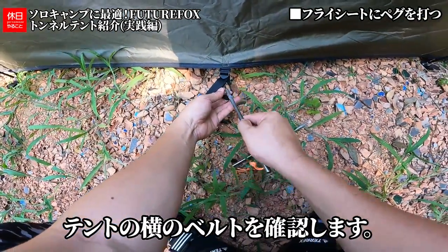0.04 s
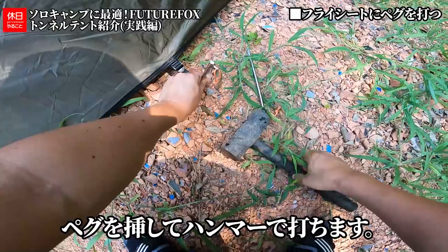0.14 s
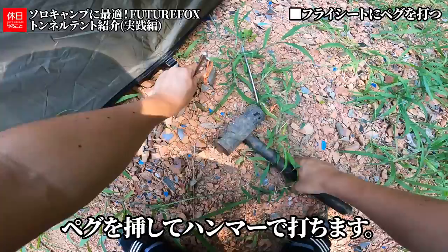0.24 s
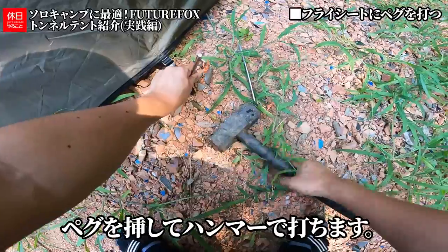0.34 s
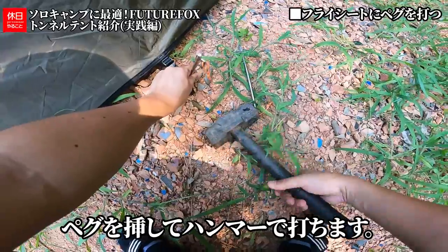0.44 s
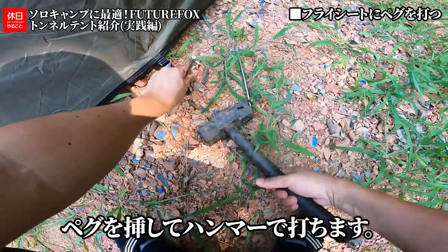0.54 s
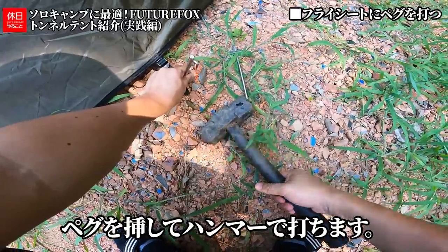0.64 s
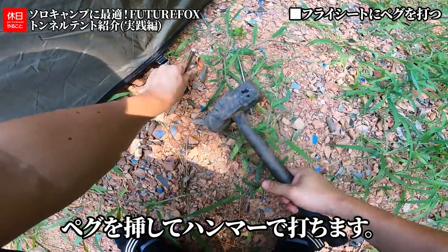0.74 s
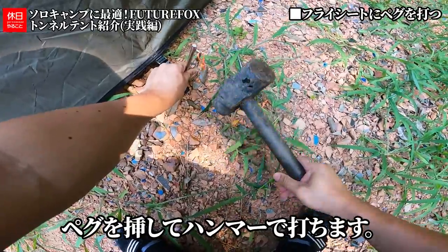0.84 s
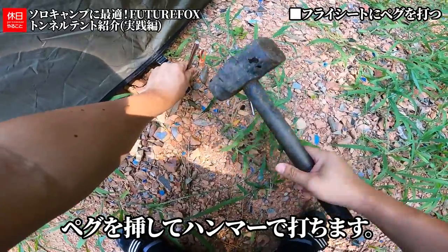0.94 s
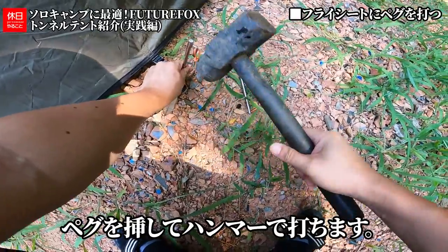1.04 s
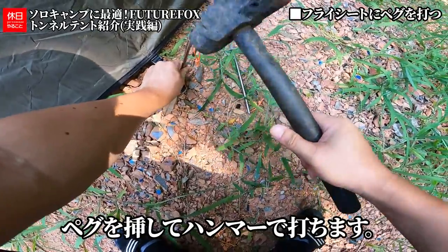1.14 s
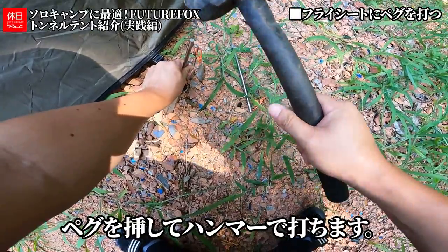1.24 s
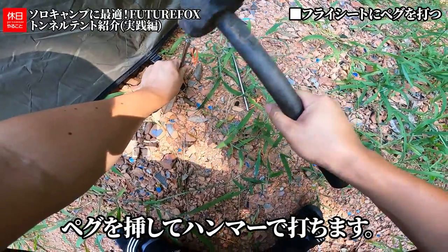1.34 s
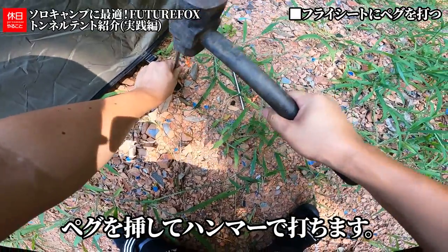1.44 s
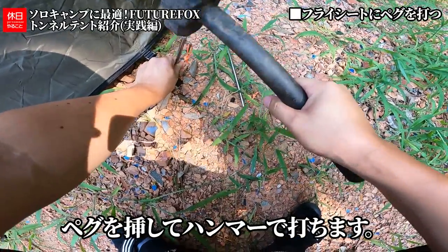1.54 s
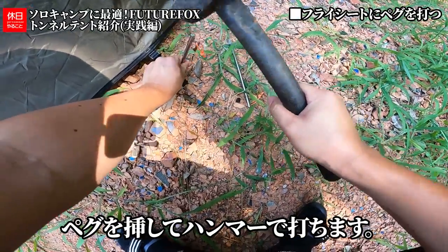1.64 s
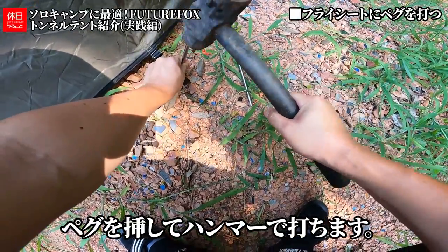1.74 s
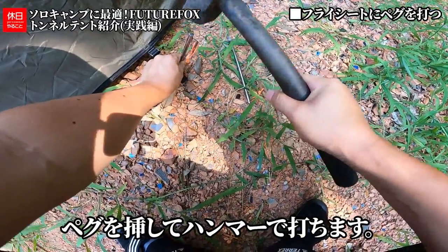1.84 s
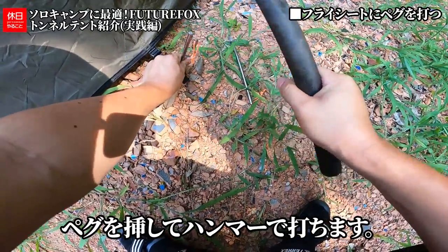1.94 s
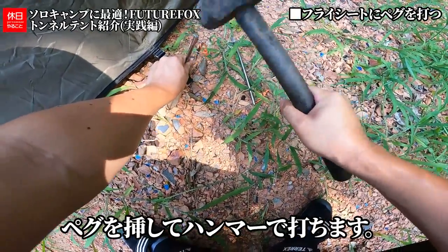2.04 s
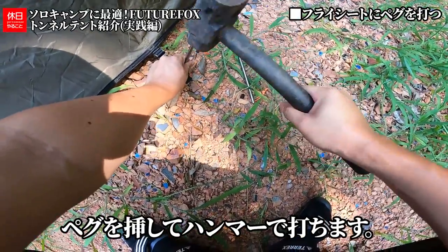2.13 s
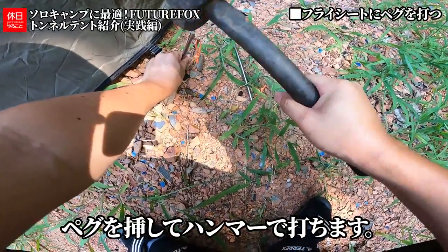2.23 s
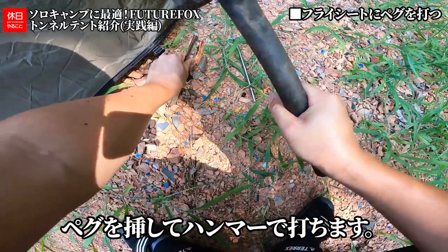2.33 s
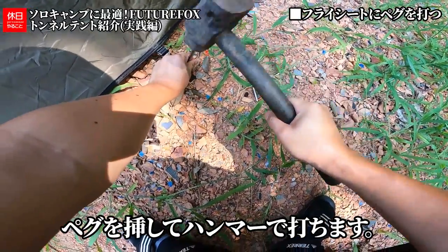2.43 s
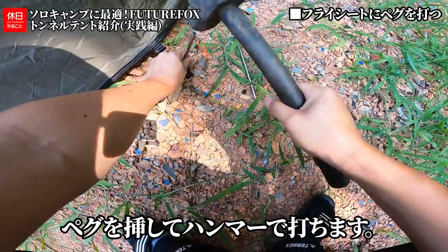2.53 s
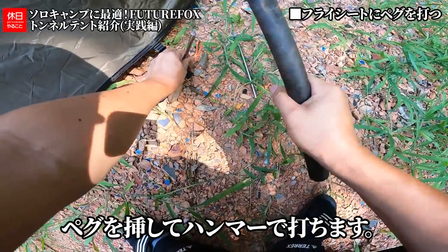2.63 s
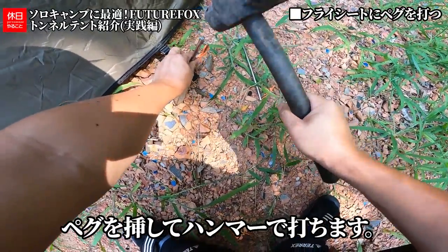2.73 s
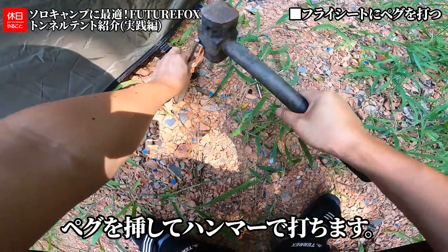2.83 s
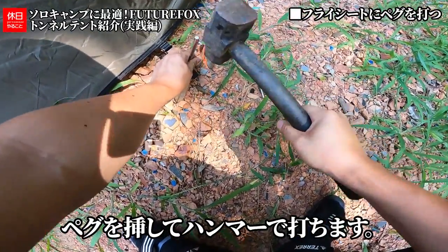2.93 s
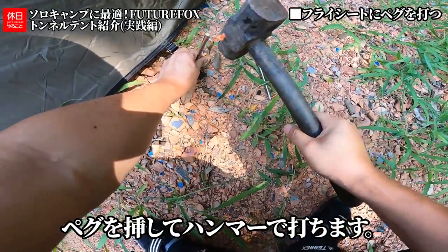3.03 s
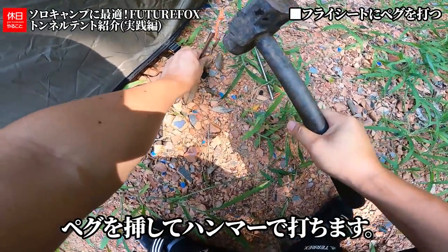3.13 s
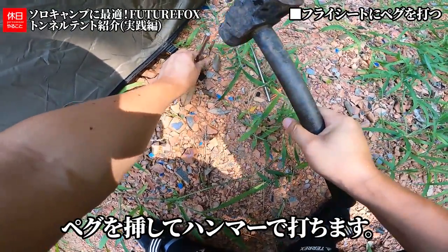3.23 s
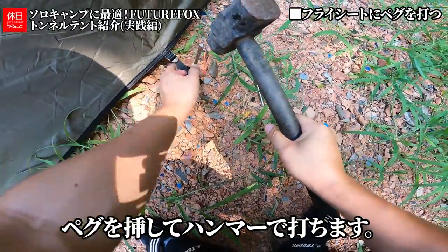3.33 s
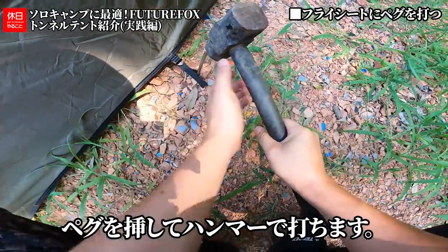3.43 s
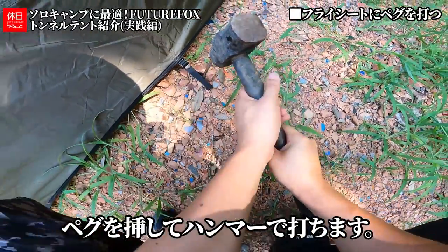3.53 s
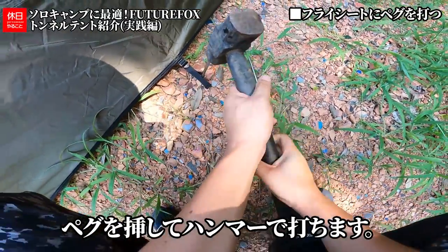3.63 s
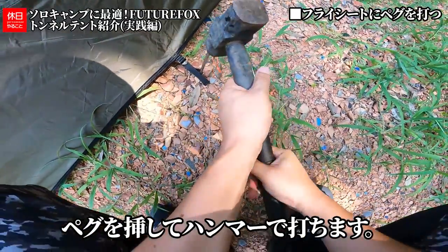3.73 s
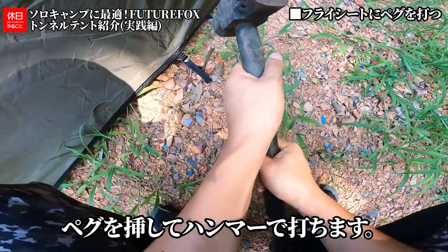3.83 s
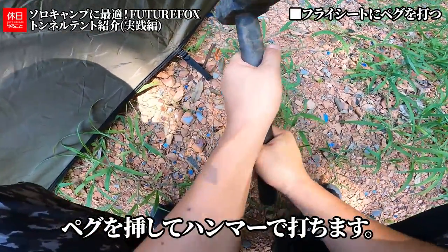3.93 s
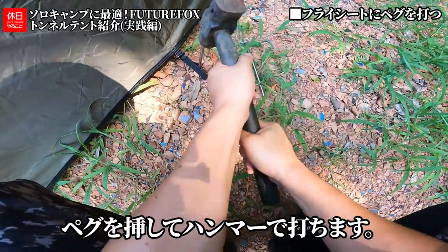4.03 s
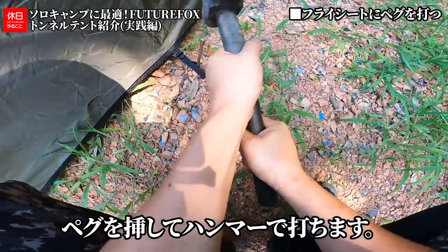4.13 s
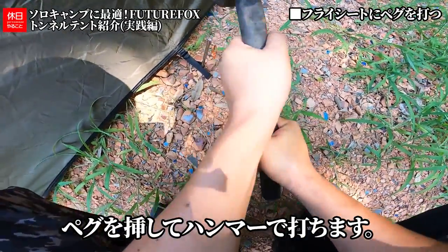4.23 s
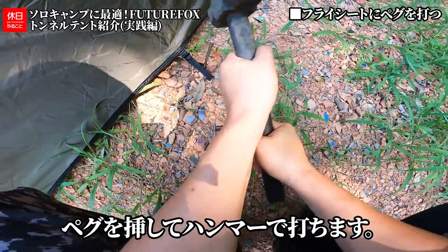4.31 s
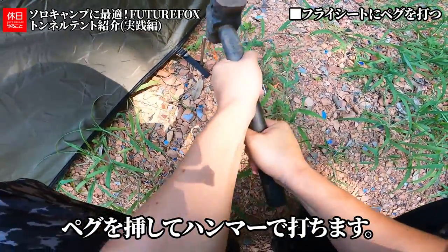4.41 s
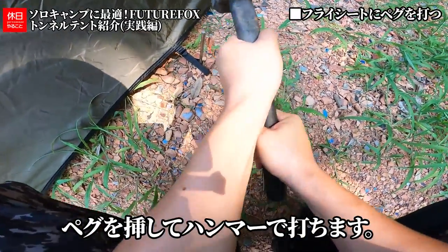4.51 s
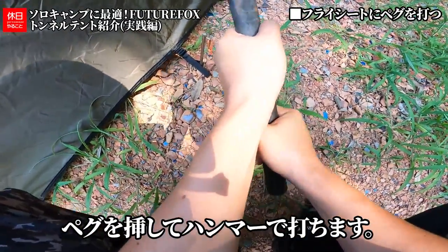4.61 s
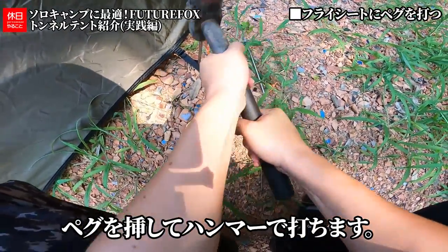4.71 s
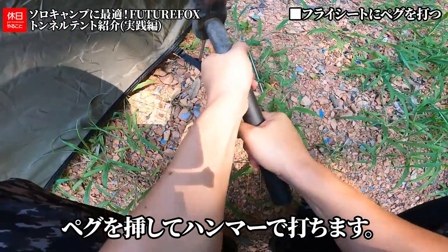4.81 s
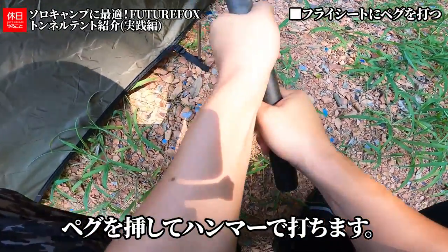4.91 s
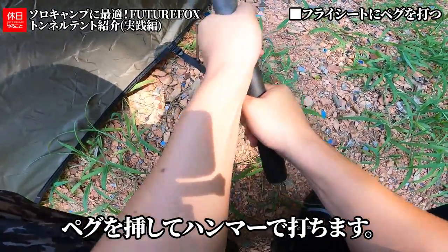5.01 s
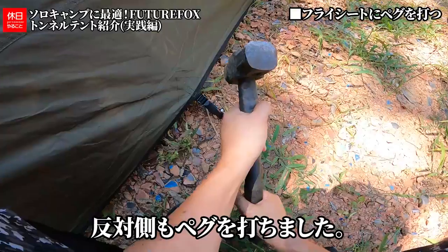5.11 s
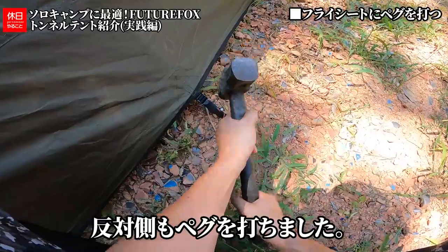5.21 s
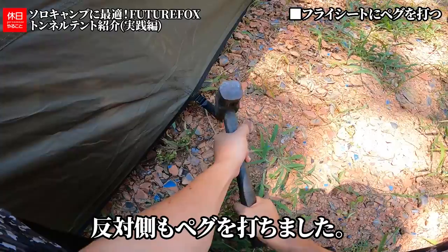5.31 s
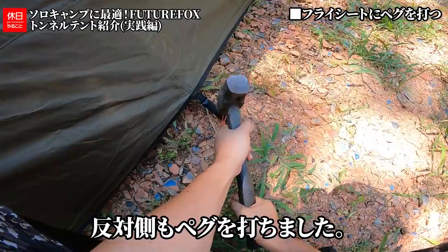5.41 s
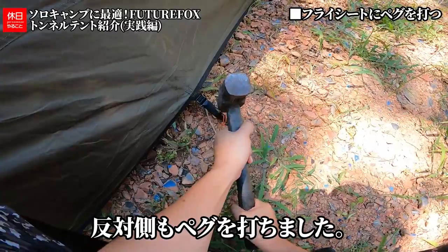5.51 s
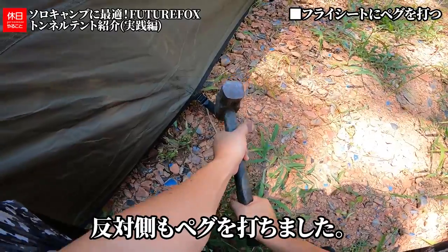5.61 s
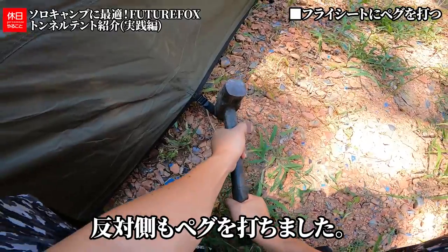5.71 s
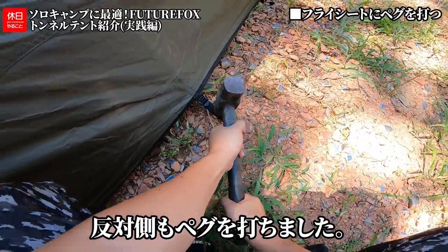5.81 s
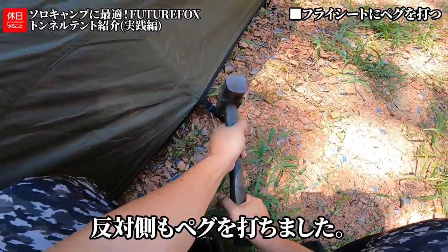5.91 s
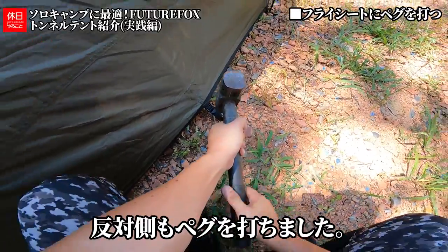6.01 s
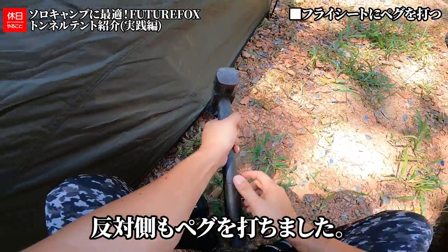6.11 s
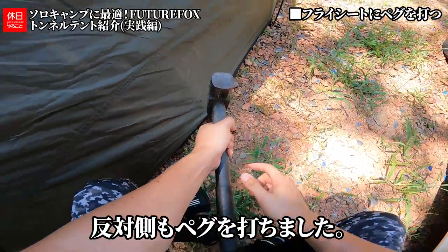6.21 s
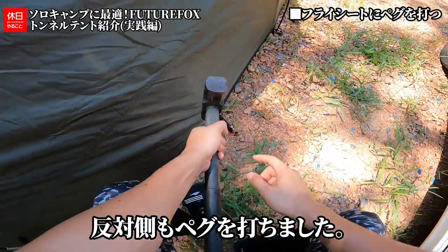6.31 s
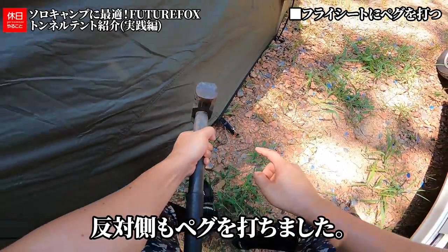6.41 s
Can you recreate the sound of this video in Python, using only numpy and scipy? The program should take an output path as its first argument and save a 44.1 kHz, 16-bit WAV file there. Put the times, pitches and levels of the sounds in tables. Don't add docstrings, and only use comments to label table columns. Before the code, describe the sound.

Close, dry outdoor stereo pickup of a tent peg being hammered into stony soil. Handling noise and clicking pebbles lead to five short ringing strikes about a third of a second apart; coarse grit crunches, three firmer strikes follow, sound drops out briefly, then two muffled, thuddier strikes. A faint steady high insect chorus, hiss and low wind buffeting lie far below the blows.

```python
import sys
import numpy as np
from scipy import signal
from scipy.fft import rfft, irfft
from scipy.io import wavfile
from scipy.ndimage import uniform_filter1d

SR = 44100
rng = np.random.default_rng(int(sys.argv[2]) if len(sys.argv) > 2 else 0)


def generate_wav(sig):
    pcm = np.round(np.clip(np.atleast_2d(sig).T, -1, 1) * 32767).astype(np.int16)
    wavfile.write(sys.argv[1], SR, pcm)


def linear_from_db(decibels):
    return 10 ** (np.asarray(decibels, float) / 20)


N = 284469

# t/s, clang peak level/dB, upper modes level/dB below and above TOP_EDGE_HZ, grip number
BLOWS = [
    (1.506, -12.5, 1.5, 0.5, 0),
    (1.8648, -13, -4.5, -5, 0),
    (2.2237, -14, -1.5, 4, 0),
    (2.5561, -12, 6.5, 2.5, 0),
    (2.888, -13.5, 5.5, 0.5, 0),
    (4.147, -12, 0, 2.5, 1),
    (4.4868, -13.5, -0.5, 3.5, 1),
    (4.834, -11, 6, 1.5, 1),
    (5.3872, -11.5, -15, -29.5, 2),
    (5.733, -14.5, 2.5, -15, 2),
]
# f/Hz, level/dB
BENDS = [
    [(2736, 18), (3080, 16), (1196, 12.5), (1910, 11), (3951, 12), (4692, 14.5), (5890, 3.5), (6520, -0.5),
     (1625, 9)],
    [(2713, 17), (4890, 14.5), (1245, 10.5), (1975, 8.5), (4154, 2.5), (5720, 1), (6510, 7), (3000, 15),
     (5200, 8)],
    [(3485, 14), (6360, 14.5), (1260, 9), (2100, 14.5), (2940, 14), (4270, 7), (4720, 10), (5600, 1),
     (6810, 5), (1555, 5.5)],
    [(2887, 18), (2040, 16), (1225, 11.5), (3600, 11.5), (4170, 10), (5060, 16), (6160, 5), (740, 4.5),
     (2500, 11)],
    [(3087, 21), (2060, 15), (1250, 15), (4660, 2.5), (5230, 6.5), (5750, 6.5), (6540, 3.5), (1650, 11),
     (2550, 7)],
    [(2600, 14), (4920, 13.5), (1160, 17), (3010, 3), (3530, 2.5), (4410, 8), (5720, 4.5), (6940, 5),
     (2275, 15)],
    [(1980, 15), (5074, 15), (1166, 11.5), (2690, 6.5), (3240, 3), (3620, 9.5), (6730, 3), (5890, 7.5),
     (1550, 4.5)],
    [(2980, 15), (6465, 14.5), (1210, 12.5), (1860, 12), (3645, 13), (4710, 7.5), (5160, 7.5), (5740, 10),
     (4000, 12), (2300, 8.5)],
    [(2630, 13.5), (5080, 18), (967, 15), (1870, 13.5), (3630, 7.5), (4463, 15.5), (6700, 7), (3093, 13.5),
     (1393, 10.5)],
    [(3230, 15), (5075, 9), (965, 14), (1900, 10.5), (2840, 7.5), (4640, 8.5), (6450, 8), (5490, 8.5),
     (1400, 7)],
]
# f/Hz, width/Hz, level/dB
PEG = [(7770, 210, -4), (7970, 350, -4.5), (8256, 150, 1), (9425, 120, -6.5), (10300, 210, -11),
       (11180, 250, -7), (11770, 200, -4), (12700, 280, 2.5), (13460, 300, -7), (14100, 350, 5.5),
       (15000, 300, -6.5)]
# f/Hz, level/dB, T60/s
HEAD = [(2223, -26, .2), (9540, -10, .05), (11220, -14, .15), (12680, -8, .045), (14150, -5, .045)]
HEAD_RING_DB = (-36, -31, -29)
DULL_HZ = (20000, 20000, 11300)
HAZE_DB = (-6.5, -10, -6.5, -8.5, -13.5, -12, -13, -13.5, -9, -11.5)
# f/Hz, level/dB
HAZE_LINES = [
    [(3046, 12), (5017, 10), (3337, 8), (1636, 7)],
    [(5114, 13), (2648, 10), (5383, 7)],
    [(6416, 11), (4349, 9), (5200, 9), (3520, 9)],
    [(4349, 15), (3692, 13), (2013, 9), (4834, 9)],
    [(2110, 13), (3423, 12), (1356, 11)],
    [(2487, 16), (2196, 11), (4543, 9)],
    [(5254, 12), (3509, 11), (1830, 11), (2207, 11)],
    [(3240, 12), (4371, 9), (2885, 7)],
    [(2583, 17), (4834, 14), (2293, 11), (4360, 10)],
    [(4920, 14), (2670, 10), (3229, 9)],
]
# dip t/s, f/Hz, level/dB, rebound delay/s, f/Hz, level/dB
THUDS = [
    (1.5098, 330, -15, .0083, 250, -15),
    (1.8688, 310, -11, .008, 250, -15),
    (2.2273, 310, -15, .0087, 260, -15),
    (2.5603, 310, -15.5, .0093, 240, -16),
    (2.8919, 310, -13, .0033, 250, -19),
    (4.1513, 300, -19, .0083, 200, -13.5),
    (4.4919, 280, -16, .0064, 190, -10.3),
    (4.8397, 270, -15.5, .006, 180, -11),
    (5.392, 370, -10, .0098, 88, -15),
    (5.7369, 370, -10, .0066, 400, -14.5),
]
DIP_TURNS = (.95, .95, .95, .95, 1., .9, .8, .8, .7, .8)
REBOUND_TURNS = (.66, .67, .67, .67, .66, .72, .58, .56, .78, .55)
SETTLES_DB = (-30, -30, -31, -30, -42, -25, -25, -29, -21, -25)
SPRING_PACE = (1, 1, 1, 1, 1, .62, .55, .58, .55, .8)
# f/Hz, level/dB, T60/s
SOIL = [(35.8, -28.5, 0.24), (56.5, -7, 0.05), (190, -32, 0.033), (365, -34.5, 0.024)]
# t/s, level/dB, f/Hz, T60/s
JINGLES = [(.485, -47, 1390, .16), (.491, -46, 5620, .07), (.514, -48, 5620, .13), (.504, -45, 2900, .09),
           (.417, -50, 1400, .09), (.417, -54, 3400, .05), (.56, -56, 2200, .044), (1.872, -54, 3760, .25),
           (1.872, -56, 5350, .2), (1.93, -58, 4250, .15), (4.842, -54, 3870, .19),
           (5.394, -38, 1570, .065), (5.394, -46, 2210, .09), (5.394, -46, 1230, .1)]
# t/s, peak level/dB, f/Hz
STONES = [(0.062, -21.5, 400), (0.098, -34.5, 1060), (0.446, -39, 2200), (0.498, -48, 2000),
          (0.477, -37, 5000), (0.546, -28.5, 2360), (0.71, -39, 4300), (0.62, -37, 1870),
          (0.702, -27.5, 1320), (0.79, -45, 3060), (0.782, -45.5, 1060), (0.875, -43.5, 2300),
          (1, -42.5, 2900), (1.3, -47, 1380), (1.646, -50, 1800), (4.311, -54, 1400), (4.576, -39.5, 1510),
          (4.706, -48, 1330), (5.065, -45.5, 1580), (6.011, -50, 990), (6.07, -49, 2250),
          (6.262, -36, 2060), (.416, -58, 1500), (.483, -55, 1360), (0.55, -37, 2630), (.507, -42, 320),
          (0.55, -46, 1700), (4.347, -54, 1200), (4.37, -52.5, 1600), (4.6, -54, 1500), (5.5, -54, 1600),
          (1.646, -44.5, 3500), (2.1, -43, 5200), (1.4, -42, 2900), (5.7, -44, 3400), (.061, -39, 2600),
          (.062, -29, 1100), (0.67, -45, 1100), (7, -54, 2900), (4.292, -54, 1500), (5.1, -53, 1200),
          (.545, -31.5, 3540), (.547, -34.5, 1300), (0.61, -43.5, 1200), (0.34, -44, 3000),
          (0.44, -39.5, 4900), (0.45, -42, 3500), (.534, -38, 3700), (.488, -37, 3600), (.482, -41, 2500),
          (0.51, -46, 1500), (2.999, -44.5, 1400), (3.07, -54, 1500)]
# t/s, peak level/dB, f/Hz
CRUNCH = [(3.399, -41, 1240), (3.427, -42, 1210), (3.554, -29, 1180), (3.597, -28.5, 930),
          (3.635, -16, 1110), (3.644, -21.5, 1220), (3.662, -15.5, 1160), (3.68, -27, 1380),
          (3.692, -23.5, 850), (3.717, -35, 1000), (3.761, -35, 2540), (3.855, -32.5, 895),
          (3.881, -11.5, 1210), (3.924, -29, 1070), (3.963, -38.5, 1020), (4.006, -37, 1050),
          (4.02, -40, 3500), (4.028, -34.5, 1460), (4.048, -29, 650), (4.089, -42.5, 1055),
          (3.546, -42, 993), (3.566, -34, 1500), (3.572, -34, 780), (3.584, -32, 1200), (3.61, -28, 1120),
          (3.617, -35, 1800), (3.667, -24, 1250), (3.673, -32, 800), (3.739, -35, 1320), (3.753, -39, 700),
          (3.881, -28, 2900), (4.028, -33.5, 2400), (4.031, -28, 380), (4.05, -38, 1750), (3.718, -41, 800),
          (3.515, -47, 1220), (3.543, -34, 1040), (3.6, -27, 550), (3.629, -35, 1600), (3.653, -36, 1400),
          (3.706, -35, 1000), (3.77, -36, 900), (3.797, -44, 1370), (3.58, -34, 1100)]
# peak t/s, level/dB, rise/(dB/s), fall/(dB/s)
SHUFFLES = [(.11, -64, 63, 69), (0.502, -47.5, 114.5, 97), (.71, -58.5, 92, 99), (.9, -65, 80, 67),
            (1.11, -63, 53, 118), (3.05, -62.5, 75, 95), (3.42, -62, 244, 59.5), (3.58, -48, 154, 38.5),
            (3.66, -42.5, 113, 140), (3.88, -50.5, 71.5, 102.5), (4.04, -54.5, 82, 135.5),
            (4.3, -63.5, 58.5, 102.5), (4.58, -81.5, 118, 132), (5.397, -42, 898.5, 420),
            (5.742, -46.5, 900.5, 419), (6.01, -62.5, 64, 74), (6.27, -65.5, 159, 75)]
# delay/s, level/dB re clang, rise/(dB/s), fall/(dB/s)
SPRAY = (.012, -42, 900, 140)
# f/Hz, level/dB per Hz
GRIT = [(180, -40), (300, -16), (333, -7), (406, -13), (765, -1), (957, -27), (1200, -6.5), (2080, -13),
        (7000, -24.5), (9100, -55), (15400, -120)]
# f/Hz, level/dB per Hz
RUSTLE = [(180, -37.5), (300, -0.5), (516, -6), (734, -22.5), (1150, -4), (1440, -9.5), (2620, -8),
          (5000, -9.5), (6500, -46.5), (11000, -120)]
# t/s, level/dB, share of the high choir (0-1)
CICADAS = [(0.0, -41, 0.1), (0.11, -42.5, 0.12), (0.4, -50.5, 0.5), (0.57, -46.5, .5), (0.92, -48.5, 0.5),
           (1.44, -49.5, 0.5), (1.9, -52, 0.5), (2.3, -50.5, 0.4), (2.83, -50.5, 0.4), (3.36, -51, .4),
           (3.6, -50, 0.3), (4.3, -48.5, 0.2), (5.1, -47.5, 0.2), (5.36, -47, .2), (5.6, -44, 0.2),
           (6.0, -47, 0.2), (6.45, -46.5, 0.2)]
# f/Hz, level/dB per Hz
HIGH_CHOIR = [(2060, -41.5), (3500, -41), (4490, -30), (5110, -15), (5530, -16.5), (5730, -14),
              (6820, -23.5), (7420, -14.5), (8080, 4), (8490, 9), (10500, -12.5), (11500, -46),
              (15000, -64), (22000, -120)]
# f/Hz, level/dB per Hz
LOW_CHOIR = [(2060, -42.5), (3500, -43), (4310, -25), (5060, -15), (5760, -10), (6110, -3), (7310, 6.5),
             (9520, -19.5), (11500, -35), (15000, -61.5), (22000, -120)]
# f/Hz, width/Hz, level/dB re chorus
SINGERS = [(5870, 50, -15), (6470, 70, -13), (7020, 40, -16), (7890, 35, -11), (8340, 90, -4.5),
           (8700, 60, -13)]
# t/s, level/dB
WIND = [(0.0, -57), (0.11, -55.5), (0.38, -53.5), (0.47, -44.5), (0.62, -60.5), (1.1, -59.5), (1.35, -63.5),
        (2.1, -62), (3.15, -61.5), (3.35, -65), (3.65, -55), (4.05, -48), (4.4, -52.5), (5.0, -66),
        (5.3, -39.5), (5.43, -31.5), (5.6, -34.5), (5.9, -39), (6.45, -45.5)]
# delay/s, level/dB re clang, rise/(dB/s), fall/(dB/s)
RUMBLE = (.03, -38, 500, 150)
# f/Hz, level/dB per Hz
GUST = [(12, -46.5), (20, -11), (70, 4), (114, -11), (151, -10), (210, -9), (343, -35), (560, -51),
        (700, -51), (910, -81.5), (1540, -120)]
# f/Hz, level/dB per Hz
BREEZE = [(12, -38.5), (20, -19.5), (48, 4.5), (112, -9.5), (175, 0.5), (300, -14.5), (398, -19.5),
          (435, -26), (700, -30.5), (910, -43.5), (1540, -120)]
# peak t/s, level/dB, rise/(dB/s), fall/(dB/s)
SWISHES = [
    (.66, -81, 16.5, 25.5),
    (1.3, -78.5, 25, 18.5),
    (3.65, -76.5, 36, 8.5),
    (4.05, -75.5, 20.5, 29.5),
    (6.25, -77, 23.5, 15),
]
# f/Hz, level/dB per Hz
HISS = [(6240, -25.5), (10600, -9.5), (11000, -15.5), (11500, -15.5), (12300, -15), (13300, -10),
        (14300, -8.5), (15100, -16), (16000, -21)]
# f/Hz, level/dB per Hz
CLOTH = [(6240, -28), (10600, -5), (11300, -5), (12700, 0.5), (13400, 2.5), (15100, -10), (16000, -16.5)]
# f/Hz, likeness (0-1)
SAME = [(60, 0.98), (700, 0.98), (2400, 0.92), (5000, 0.93), (7500, 0.84), (9500, .92), (11000, 0.63),
        (15000, 0.55)]
# f/Hz, phase/rad
LEAD = [(9500, 0), (11000, -.3), (12600, -1), (14200, -1.9), (16000, -2.2)]
# f/Hz, phase/rad
TURNED = [(500, 0), (1200, -.12), (3000, -.36), (5000, -.2), (6500, -.4), (8500, -.45), (11000, 0)]
# from t/s, to t/s
TURNED_S = (3.45, 5.2)
# from t/s, to t/s, width level/dB
WIDE_BODY = [(0, .2, 0), (.58, .7, -9), (.76, .87, -9), (1.1, 1.21, -9), (1.5, 1.54, -3), (1.95, 2.2, -18),
             (2.53, 2.59, -5), (2.7, 2.9, -18), (3.25, 3.5, -7), (3.5, 5.2, 2), (5.85, 6.13, -10)]
# from t/s, to t/s, width level/dB
WIDE_TOP = [(0, .2, 0), (1.05, 5.2, 0), (6.0, 6.5, 0)]
# cut t/s, fade-in start t/s, fade-in length/s
CUTS = [
    (0.114, 0.31, 0.06),
    (5.095, 5.27, 0.067),
]

TOP_EDGE_HZ = 10800


def blow(clang, bends, haze_db, soil, dip_turns, back_turns, settle_db, pace, haze_lines, draws):
    s, db, high_db, top_db, grip = clang
    grip = round(grip)
    t = np.arange(-2000, 10000) / SR
    upper = []
    for (f, width, g), chance in zip(PEG, draws[2][-len(PEG):]):
        strike_db = top_db if f > TOP_EDGE_HZ else high_db
        upper.append((f, width, g + strike_db + 2.5 * chance))
    modes = [(f, 650, g) for f, g in bends] + upper

    crack = chatter(t, modes, draws)
    around = haze(t, modes, haze_lines, draws[1])
    steel = linear_from_db(db + 4.0) * (crack + linear_from_db(haze_db) * around) / abs(crack).max()
    steel = steel + linear_from_db(db) * ring(t, bends[:2], HEAD_RING_DB[grip], draws[2])
    shade = signal.butter(6, DULL_HZ[grip], fs=SR, output="sos")
    ground = rebound(t + s, soil, dip_turns, back_turns, settle_db, pace)
    ground = ground + linear_from_db(soil[-1]) * after_shake(t, draws[2])
    return s + t[0], signal.sosfilt(shade, steel) + ground


def mode(x, hz, width):
    return evened(resonate(resonate(x, hz, width), hz, 3 * width))


def chatter(t, modes, draws):
    touch_s, touch_t60_s = 0.0013, 0.01
    push = np.clip(t / 0.0023, 0, 1) * linear_from_db(-60 * np.maximum(t - touch_s, 0) / touch_t60_s)
    crack = 0
    for (f, width, g), d in zip(modes, draws[1][-len(modes):]):
        force = push * (np.sin(2 * np.pi * f * t + 3 * d) + draws[0])
        crack = crack + linear_from_db(g) * mode(force, f, width)
    band = signal.butter(3, (650, 6000), "band", fs=SR, output="sos")
    return crack + linear_from_db(11.5) * evened(signal.sosfilt(band, push * draws[1]))


def haze(t, modes, haze_lines, draw):
    lines = rfft(draw[:2048])
    lines = irfft(lines * (abs(lines) > 1.35 * np.sqrt(2048)))
    lines = evened(np.resize(lines, len(t)))
    frame = np.cos(np.pi / 2 * np.clip(t / .036, -1, 1))
    fade = frame * linear_from_db(-853 * np.maximum(-t, 0) - 1150 * np.maximum(t, 0))
    spread = lines * fade
    out = sum(linear_from_db(g - 17 * (f > TOP_EDGE_HZ)) * mode(spread, f, width) for f, width, g in modes)
    strongest = sum(linear_from_db(g + 3) * evened(fade * np.sin(2 * np.pi * hz * t)) for hz, g in haze_lines)
    return .8 * out + strongest


def ring(t, strongest, ring_db, draw):
    after = np.maximum(t, 0)
    out = 0
    for (f, g, t60), d in zip(HEAD, draw):
        out = out + linear_from_db(g + ring_db + 2 * d - 60 * after / t60) * np.sin(2 * np.pi * f * after)
    hum = linear_from_db(-37 - 60 * after / .14)
    return out + sum(hum * np.sin(2 * np.pi * hz * after) for hz, _ in strongest)


def rebound(t, soil, dip_turns, back_turns, settle_db, pace):
    dip_s, dip_hz, dip_db, back_s, back_hz, back_db = soil
    late = t - dip_s - back_s
    ground = thud(t - dip_s, dip_db, dip_hz, (dip_turns, .65), pace)
    ground = ground + thud(late, back_db, back_hz, (back_turns, .5))
    return ground + linear_from_db(settle_db) * np.exp(-((late - .0078) / .0045) ** 2)


def thud(t, db, hz, shape, pace=1):
    centre, spread = shape
    turns = np.maximum(t * hz * np.where(t > 0, pace, 1) + 3 / 4, 0)
    return linear_from_db(db) * np.sin(2 * np.pi * turns) * np.exp(-((turns - centre) / spread) ** 2)


def after_shake(t, draw):
    after = np.maximum(t, 0)
    shake = 0
    for f, g, t60 in SOIL:
        shake = shake + linear_from_db(g - 60 * after / t60) * resonate(resonate(draw, f, 180), f, 200) * 12
    return shake * np.clip((t - .012) / .005, 0, 1)


def jingle(db, hz, t60):
    t = np.arange(8000) / SR
    return linear_from_db(db - 60 * t / t60) * np.sin(2 * np.pi * hz * t) * np.minimum(t / 0.0025, 1)


def stone(db, hz, t60, scrape):
    t = np.arange(len(scrape)) / SR
    click = abs(t - .0015) < .0001
    tick = (0.5 * scrape + 1.19 * click) * linear_from_db(-60 * t / max(t60, .003)) * np.minimum(t / 0.002, 1)
    knock = resonate(resonate(tick, hz, 990), hz, 930) + 0.16 * resonate(tick, 1.5 * hz, 450)
    knock = knock + 0.087 * resonate(tick, 1400, 1900) + 0.12 * resonate(tick, 3900, 2411)
    band = signal.butter(3, (200, 5500), "band", fs=SR, output="sos")
    knock = signal.sosfilt(band, knock)
    return linear_from_db(db) * knock / abs(knock).max()


def gravel(t):
    def level(at):
        return swells(-73, SHUFFLES + after_blows(*SPRAY), at)

    def colour(hz, at):
        return blend((level(at) + 58) / 9, GRIT, RUSTLE, hz)

    db = level(t)
    grains = linear_from_db(3.2 * np.minimum(rng.exponential(1, N), 3))
    grains = grains * (rng.random(N) < 320 / SR)
    chop = signal.oaconvolve(grains, linear_from_db(-60 * t[:1500] / .022))[:N]
    hard = np.clip((db + 66) / 16, .2, .75)
    bed = noise(colour, patchy_db=3.0, size=256)
    return linear_from_db(db) * bed * (np.sqrt(1 - hard ** 2) + hard * evened(uniform_filter1d(chop, size=40)))


def cicadas(t):
    def colour(hz, at):
        return blend(curves(CICADAS, at)[1], HIGH_CHOIR, LOW_CHOIR, hz)

    db, share = curves(CICADAS, t)
    choirs = noise(colour, patchy_db=1.43)
    buzz = rng.standard_normal(N)
    near = sum(linear_from_db(g) * evened(resonate(resonate(buzz, f, w), f, 2 * w)) for f, w, g in SINGERS)
    return linear_from_db(db) * (choirs + np.clip((share - .3) / .3, 0, 1) * near)


def wind(t):
    def level(at):
        return swells(curves(WIND, at)[0], after_blows(*RUMBLE), at)

    def colour(hz, at):
        return blend((level(at) + 56.0) / 12, GUST, BREEZE, hz)

    return linear_from_db(level(t)) * noise(colour, patchy_db=2.5, size=1024)


def air(t):
    def level(at):
        return swells(-79.5, SWISHES, at)

    def colour(hz, at):
        return blend((level(at) + 82.5) / 3, CLOTH, HISS, hz)

    return linear_from_db(level(t)) * noise(colour, patchy_db=1.1)


def noise(colour_db, patchy_db, size=512):
    frames, hz = 4 * N // size + 5, np.fft.rfftfreq(size, 1 / SR)[:, None]
    a, b, c, d, patches = rng.standard_normal((frames, len(hz), 5)).T
    patches = uniform_filter1d(patches, size=6, axis=0)
    patches = evened(uniform_filter1d(patches, size=12, axis=1))
    shape = linear_from_db(colour_db(hz, np.arange(frames) * size / 4 / SR) + 0 * patches)
    shape = shape / np.sqrt((shape ** 2).mean(0)) * linear_from_db(patchy_db * patches)
    same = np.clip(read(SAME, hz), -1, 1)
    left = a + 1j * b
    right = same * left + np.sqrt(1 - same ** 2) * (c + 1j * d)
    z = np.array([left, right])
    return evened(signal.istft(z * shape, nperseg=size, noverlap=3 * size // 4)[1][:, :N])


def resonate(x, hz, width):
    turn = np.exp(2j * np.pi * hz * np.arange(len(x)) / SR)
    r = np.exp(-np.pi * width / SR)
    return 2 * (turn * signal.lfilter([1 - r], [1, -r], x / turn)).real


def swells(rest_db, rows, t):
    power = linear_from_db(2 * rest_db)
    for s, db, rise, fall in rows:
        slope = np.where(t < s, abs(rise), abs(fall))
        power = power + linear_from_db(2 * (db - slope * abs(t - s)))
    return 10 * np.log10(power)


def after_blows(late, db, rise, fall):
    return [(s + late, clang_db + db, rise, fall) for s, clang_db, *_ in BLOWS]


def evened(x):
    return x / np.sqrt(np.mean(x ** 2) + 1e-20)


def read(points, hz):
    f, value = np.transpose(points)
    return np.interp(np.log(hz + 1), np.log(f + 1), value)


def blend(share, a, b, hz):
    share = np.clip(share, 0, 1)
    return share * read(a, hz) + (1 - share) * read(b, hz)


def curves(rows, t):
    s, *columns = np.transpose(rows)
    return [np.interp(t, s, c) for c in columns]


def add(mix, s, sound):
    part = mix[round(s * SR):][:len(sound)]
    part += sound[:len(part)]


def lead(x, points):
    port = np.exp(.5j * read(points, np.fft.rfftfreq(2 ** 19, 1 / SR)))
    return irfft(rfft(x, 2 ** 19) * [port, 1 / port])[:, :N]


def width_gain(spells, t):
    return uniform_filter1d(sum(linear_from_db(db) * ((t >= a) & (t < b)) for a, b, db in spells), size=500)


def fold(x, t):
    mid, side = (x[0] + x[1]) / 2, (x[0] - x[1]) / 2
    body = signal.oaconvolve(side, signal.firwin(255, 11700, fs=SR), "same")
    side = width_gain(WIDE_BODY, t) * body + width_gain(WIDE_TOP, t) * (side - body)
    return np.array([mid + side, mid - side])


def scene():
    t, near = np.arange(N) / SR, np.zeros(N)
    blow_draws = rng.standard_normal((len(BLOWS), 3, 12000))
    for row in zip(BLOWS, BENDS, HAZE_DB, THUDS, DIP_TURNS, REBOUND_TURNS, SETTLES_DB, SPRING_PACE,
                   HAZE_LINES, blow_draws):
        add(near, *blow(*row))
    pebbles = STONES + CRUNCH
    for (s, db, hz), scrape in zip(pebbles, rng.standard_normal((len(pebbles), 2000))):
        add(near, s, stone(db, hz, .028, scrape))
    for s, *rattle in JINGLES:
        add(near, s, jingle(*rattle))
    near = np.where((t > TURNED_S[0]) & (t < TURNED_S[1]), lead(near, TURNED), near)
    mix = lead(near, LEAD) + cicadas(t) + wind(t) + air(t) + gravel(t)
    left_db = 2 * (t < CUTS[0][0])
    return mix * linear_from_db(np.outer([.5, -.5], left_db))


def band_limit(x):
    return signal.sosfilt(signal.butter(12, 16330, fs=SR, output="sos"), x)


def record(dry):
    t = np.arange(N) / SR
    x = signal.oaconvolve(dry, signal.firwin(255, 16100, fs=SR)[None], "same", axes=1)
    x = fold(x, t)
    for cut, start, length in CUTS:
        fade_out = np.clip((cut - t) / 0.0074 + 1, 0, 1)
        fade_in = np.clip((t - start) / length, 0, 1) ** 1.9
        x = x * np.where(t < cut + .02, fade_out, fade_in)
    return band_limit(x)


dry = scene()
out = record(dry)
generate_wav(out)
```